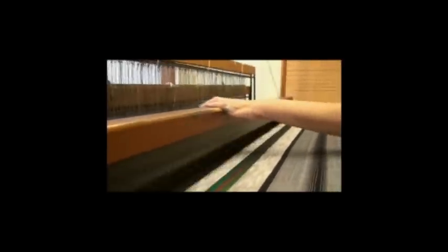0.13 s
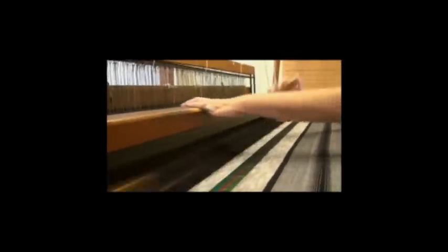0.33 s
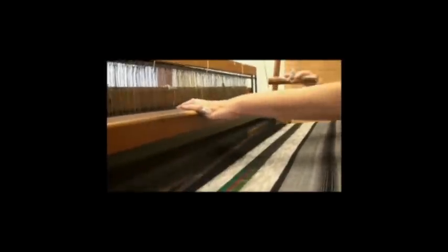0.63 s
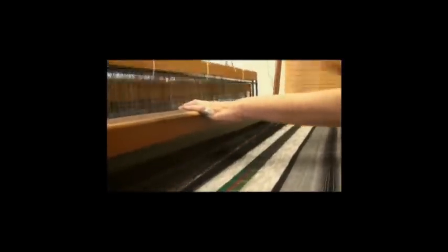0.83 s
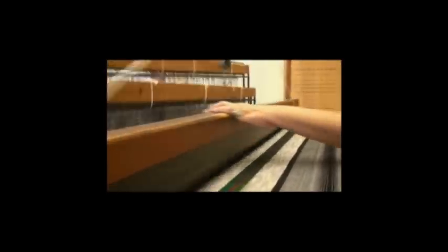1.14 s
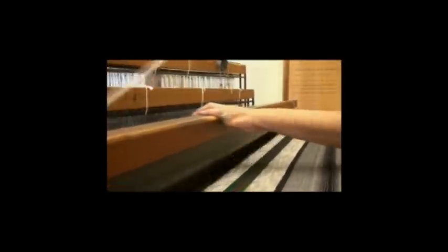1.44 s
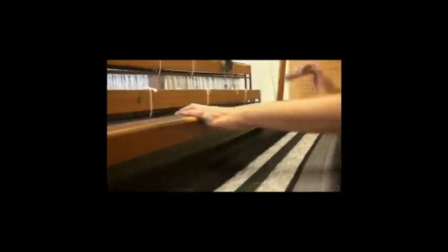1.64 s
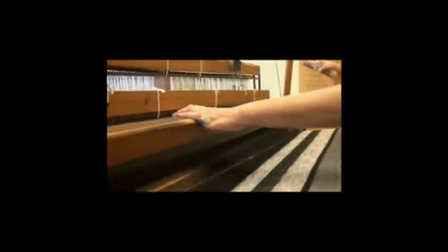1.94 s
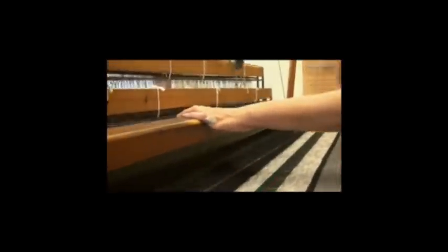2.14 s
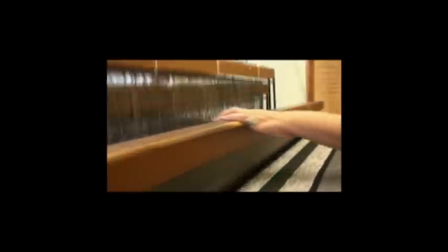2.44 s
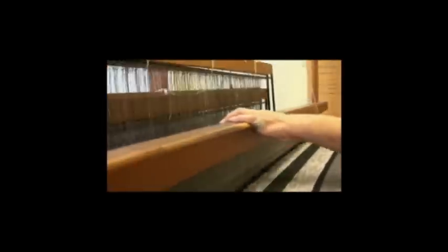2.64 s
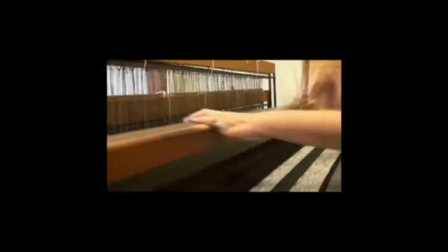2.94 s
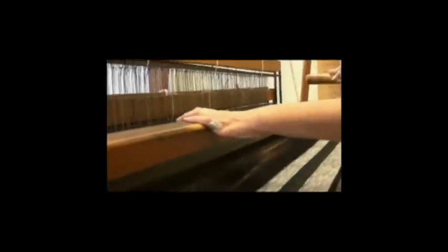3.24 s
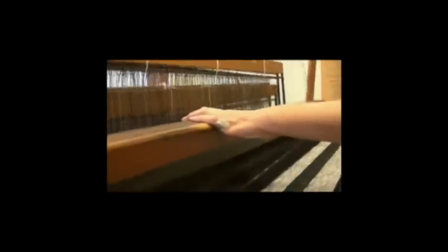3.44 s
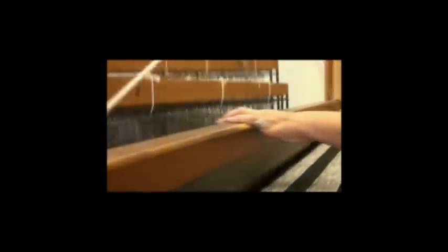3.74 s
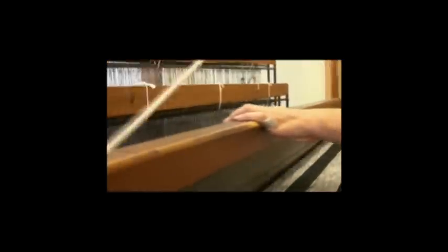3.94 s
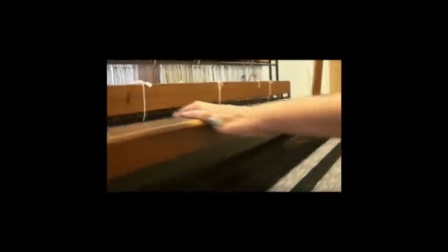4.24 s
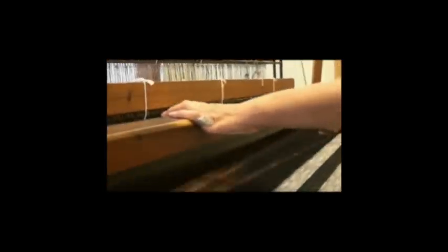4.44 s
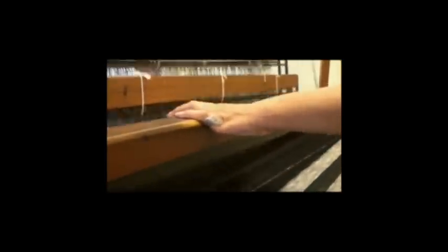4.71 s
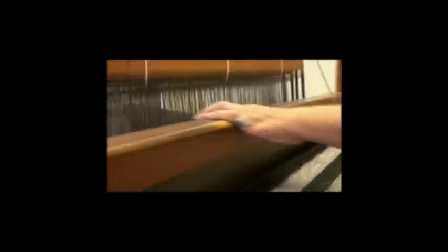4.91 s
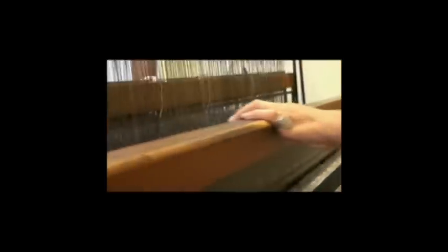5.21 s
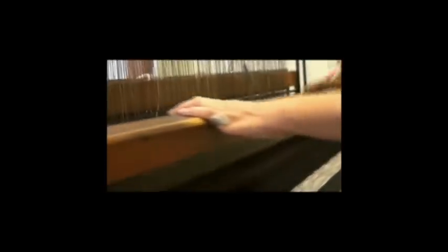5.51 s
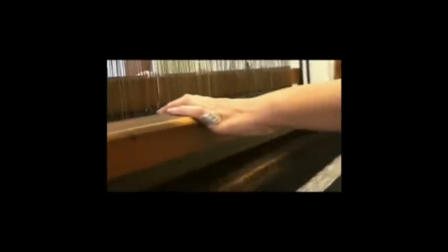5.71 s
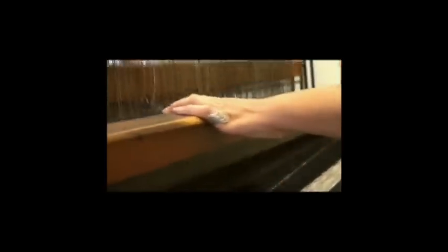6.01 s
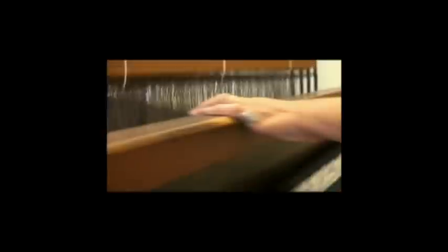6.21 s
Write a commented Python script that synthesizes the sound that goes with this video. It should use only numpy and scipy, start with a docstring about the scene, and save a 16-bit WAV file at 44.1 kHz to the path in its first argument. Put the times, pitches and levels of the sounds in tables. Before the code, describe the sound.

A wooden hand loom clatters rhythmically, its shuttle rattling across and its beater knocking, with high squeaks between strokes.

```python
"""A wooden hand loom

In a small workshop, close to a stereo microphone, the shuttle is knocked across and rattles along
its track. The beater (the bar that packs the thread) and the shafts (the frames that lift it) thud
and shake the heddles, their thin wires. Dry pivots squeak and creak each time the shafts change over."""
import sys
import numpy as np
from scipy import signal
from scipy.fft import rfft, irfft
from scipy.io import wavfile
from scipy.ndimage import uniform_filter1d

SR = 44100
rng = np.random.default_rng(int(sys.argv[2]) if len(sys.argv) > 2 else 0)


def unload_wav(signal):
    """Save mono or channel-first audio to the path in sys.argv[1] as 16-bit WAV at rate SR, clipped to [-1, 1]."""
    wavfile.write(
        sys.argv[1],
        SR,
        np.round(np.clip(np.atleast_2d(signal).T, -1, 1) * 32767).astype(np.int16),
    )


N = 280476


def amp(db):
    """Turns decibels into a multiplier."""
    return 10 ** (np.asarray(db) / 20)


def unit_rms(x):
    """Scales x to an average strength (rms) of 1."""
    return x / np.sqrt(np.mean(x ** 2) + 1e-20)


def curve_at(points, hz):
    """Reads a curve of (frequency, value) points at hz."""
    f, value = np.transpose(points)
    return np.interp(np.log(hz + 1), np.log(f + 1), value)


def add(mix, start, sound, pan_db=0):
    """Mixes a sound in at start seconds, pan_db louder on the left than on the right."""
    part = mix[:, round(start * SR):][:, :sound.shape[-1]]
    part += sound[..., :part.shape[1]] * amp([[pan_db / 2], [-pan_db / 2]])


def coloured(x, points):
    """Shapes the lows and highs of x by (Hz, dB) points, at rms 1."""
    size = x.shape[-1]
    gain = amp(curve_at(points, np.fft.rfftfreq(size, 1 / SR)))
    return unit_rms(irfft(rfft(x) * gain, size))


def wander(size, hz):
    """A smooth random wobble of rms 1, changing about hz times a second."""
    span = max(round(SR / hz), 2)
    return unit_rms(uniform_filter1d(uniform_filter1d(rng.standard_normal(size), span), span))


# tone of the background noise: f/Hz, relative level/dB
AIR_TONE = [(25, 41.5), (60, 18), (100, 27), (160, 24), (1000, 17), (5000, -29), (14000, -32)]

def air():
    """The quiet workshop: a low rush, almost the same in both ears."""
    common, other = coloured(rng.standard_normal((2, N)), AIR_TONE)
    return amp(-46.5) * np.array([common + 0.043 * other, common - 0.1 * other])


# how long the room takes to fade by 60 dB: f/Hz, fade/s
ROOM_FADE = [(200, 0.4), (1000, 0.31), (3000, 0.25), (10000, 0.33)]

def room(x):
    """Many small echoes blur into a tail; each band dies at its own speed."""
    echoes = np.zeros((2, SR // 2))
    delays = np.arange(200, SR // 2 - 20, 20) + rng.integers(0, 20, (2, (SR // 2 - 201) // 20))
    np.put_along_axis(echoes, delays, rng.choice([-1., 1.], delays.shape), 1)
    hz, t, bands = signal.stft(echoes, SR, nperseg=256)
    fade = amp(-60 * t / curve_at(ROOM_FADE, hz)[:, None])
    tail = signal.istft(bands * fade, SR, nperseg=256)[1]
    tail = tail + 0.2 * tail[::-1]  # close microphones hear much the same room
    return signal.fftconvolve(x[None], tail / np.linalg.norm(tail[0]), axes=1)[:, :N]


# the frame booms on the floor: t/s, level/dB
FLOOR_THUDS = [(0.025, -39), (1.356, -22.5), (2.252, -36), (2.672, -35.5)]

def thud(db):
    """Frame and floor ring with two low notes."""
    t = np.arange(12000) / SR
    boom = np.sin(2 * np.pi * 158 * t) + .25 * np.sin(2 * np.pi * 105 * t)
    return amp(db - 60 * t / .27) * boom * (1 - np.exp(-t / .01))


def slip_tone(hz, levels, unsteady, flutter_db, rasp):
    """Surfaces stick and slip unevenly; each harmonic (multiple, dB) flutters and rasps on its own."""
    size = len(hz)
    turns = np.cumsum(hz * (1 + unsteady * wander(size, 260))) / SR
    tone = np.zeros(size)
    for k, db in levels:
        level = amp(db + flutter_db * wander(size, 150)) * (1 + rasp * wander(size, 1500))
        tone += level * np.sin(2 * np.pi * k * turns) * (k * hz < SR / 2)
    return np.sqrt(2) * tone * signal.windows.tukey(size, .3)


# harmonics of a creak: multiple of the pitch, relative level/dB
CREAK_HARMONICS = [(1, -0.5), (2, -6), (3, -12), (5, 0.5), (6, -4.5), (7, -16), (9, -11), (11, -13)]
# the pivots creak: start/s, end/s, f/Hz, level/dB, brightness/(dB per octave)
PIVOT_CREAKS = [(0.941, 1.02, 1294, -32, -1), (1.088, 1.16, 1290, -32.5, 1.5),
                (1.141, 1.218, 1286, -32.5, 0), (1.191, 1.302, 1269, -34.5, 0),
                (3.586, 3.65, 1320, -42, 4.5), (3.753, 3.81, 1355, -33, 1), (3.793, 3.909, 1281, -34.5, -2),
                (6.127, 6.307, 1275, -38, -1.5), (6.273, 6.412, 1290, -29, -0.5)]

def creak(start, end, hz, db, bright_db):
    """A pivot sticks and slips at one pitch; a bar sings along when a harmonic meets its note."""
    bar_hz, bar_width_hz, bar_db = 2543, 51, 11
    levels = []
    for k, harmonic_db in CREAK_HARMONICS:
        boost_db = bar_db / (1 + ((k * hz - bar_hz) / bar_width_hz) ** 2)
        levels.append((k, db + harmonic_db + bright_db * np.log2(k) + boost_db))
    pitch = np.full(round((end - start) * SR), float(hz))
    return slip_tone(pitch, levels, unsteady=.0028, flutter_db=2.6, rasp=.28)


# hiss of the rubbing faces: f/Hz, relative level/dB
HISS_TONE = [(2000, -26), (6000, 11), (11000, 11), (16000, -1)]
# the pivots squeak: start/s, end/s, first f/Hz, bend/Hz, last f/Hz, level/dB, harmonic step/dB
PIVOT_SQUEAKS = [(0.951, 1.031, 5300, -5, 5200, -30, -12), (1.019, 1.096, 5030, 340, 5340, -25.5, -12),
                 (1.108, 1.191, 4730, 353, 5200, -27, -5.5), (1.245, 1.32, 7300, -8, 7400, -42, -18),
                 (1.264, 1.346, 5140, 80, 5300, -32, -15), (1.358, 1.517, 5600, 4, 5480, -42.5, -10),
                 (2.235, 2.343, 5150, -32, 4940, -36, 0), (2.334, 2.442, 10470, 53, 10500, -36.5, -35),
                 (2.41, 2.52, 14900, 0, 15100, -35.5, -32), (2.451, 2.525, 10700, 7, 10760, -30, -32),
                 (2.502, 2.593, 5710, -350, 5230, -28.5, -2.5), (2.596, 2.656, 5030, 247, 5460, -33, -7),
                 (2.597, 2.664, 6600, -7, 6540, -36.5, -24), (3.541, 3.664, 5730, 27, 4890, -34, -7.5),
                 (3.659, 3.758, 5040, 329, 5370, -25, -10.5), (3.755, 3.844, 4730, 260.5, 5300, -25.5, -9),
                 (3.822, 3.967, 7620, -120, 7360, -33, -16), (3.838, 3.946, 5900, -6, 5800, -36, -8),
                 (3.958, 4.06, 5040, 100, 5500, -49, -12), (4.811, 4.897, 7940, -51, 7840, -28, -24),
                 (4.874, 4.966, 7470, -3, 7430, -31, -21), (4.88, 5.06, 5150, -120, 5090, -29.5, -2),
                 (4.994, 5.089, 5690, 118, 5330, -27, -3.5), (5.063, 5.183, 5090, -200, 5015, -30, -1.5),
                 (5.135, 5.226, 5170, 78, 5720, -34.5, -7), (5.151, 5.237, 2267, 56, 2214, -39, -1.5),
                 (6.045, 6.219, 5380, -14, 5280, -38, -10), (6.197, 6.309, 5080, 405, 5200, -26.5, -10.5),
                 (6.294, 6.383, 4750, 136, 5450, -28.5, -7)]

def squeak(start, end, first_hz, bend_hz, last_hz, db, step_db):
    """Two rubbing faces slip not quite in step, making a gliding squeak and a hiss."""
    size = round((end - start) * SR)
    progress = np.linspace(0, 1, size)
    hz = first_hz + (last_hz - first_hz) * progress + bend_hz * np.sin(np.pi * progress ** 0.79)
    far_hz = hz * (1 + 0.032 * wander(size, 40))
    dbs = db + step_db * np.arange(3) ** 1.1
    hiss = coloured(rng.standard_normal(size), HISS_TONE) * signal.windows.tukey(size, .5)
    hiss *= amp(dbs.max() - 11 + 4.6 * wander(size, 150))
    near = slip_tone(hz, enumerate(dbs, 1), unsteady=0.007, flutter_db=4.5, rasp=0.33)
    far = slip_tone(far_hz, enumerate(dbs, 1), unsteady=0.009, flutter_db=5.5, rasp=0.5)
    return hiss + 0.67 * near + np.array([[0.36], [0.6]]) * far  # the far face lies to the right


# the beater's pivot chirps: t/s, level/dB, f/Hz
BEATER_CHIRPS = [(2.069, -38.5, 2520), (2.098, -34.5, 2640), (2.115, -28.5, 2550), (2.13, -33, 2534),
                 (2.17, -35, 2610), (4.7, -33.5, 2600), (4.731, -29, 2530), (4.76, -29, 2360)]

def chirp(start, db, hz):
    """A tiny falling squeak as the beater comes forward."""
    return squeak(start, start + .011, hz, bend_hz=0, last_hz=hz * 0.936, db=db, step_db=-15)


def stroke(start, swell, hold, fall_db_s):
    """The loudness of one movement: it swells, holds, then dies away."""
    age = np.arange(N) / SR - start
    return np.clip(age / swell, 0, 1) * amp(-fall_db_s * np.maximum(age - swell - hold, 0))


# the loom's movements: t/s, swell/s, hold/s, rattle level/dB, scrape level/dB, rustle level/dB
CORD_PULLS = [(0.29, 0.019, 0.096, -36.5, -44, -55), (1.58, 0.18, 0.011, -37, -47, -52.5),
              (2.96, 0.011, 0.12, -39, -43.5, -52), (4.2, .12, .02, -40.5, -57, -54.5),
              (5.47, 0.17, .01, -35, -40, -54)]  # the cord is drawn before the throw
SHUTTLE_THROWS = [(0.405, 0.072, 0.0039, -23, -30.5, -37.5), (1.748, 0.021, 0.066, -29.5, -27, -39.5),
                  (3.048, 0.048, 0.0035, -22, -25.5, -37), (4.346, 0.006, 0.087, -33, -27, -38.5),
                  (5.61, 0.065, 0.0068, -24, -26, -37)]  # the shuttle runs along its track
BEATER_SWINGS = [(0.79, 0.0028, 0.0096, -74, -55, -43.5), (1.98, 0.0066, 0.038, -43, -46, -49.5),
                 (2.16, 0.0089, 0.011, -46, -53, -48), (3.265, 0.015, 0.11, -53, -48, -47),
                 (5.85, 0.0076, 0.014, -42, -46, -51.5), (5.96, 0.0025, 0.1, -66, -47.5, -49)]  # the beater starts forward
BEATER_HITS = [(0.822, 0.0073, 0.052, -22.5, -28, -32.5), (2.185, 0.033, 0.0046, -25, -38, -39.5),
               (3.458, 0.026, 0.032, -20.5, -25.5, -31.5), (4.766, 0.0057, 0.0082, -26.5, -37, -39),
               (6.033, 0.014, 0.042, -22, -27.5, -33)]  # it packs the thread
SHAFT_CHANGES = [(0.99, 0.034, .01, -30, -28.5, -39), (1.07, .16, 0.011, -35.5, -42, -35),
                 (2.23, 0.026, 0.15, -34, -34.5, -53), (2.48, 0.043, 0.1, -38, -50, -50.5),
                 (3.63, 0.043, 0.0028, -28.5, -28, -36), (3.72, 0.16, 0.0045, -34.5, -34.5, -36.5),
                 (4.81, 0.027, 0.086, -30.5, -33, -53), (5.0, 0.13, 0.022, -35.5, -39, -43),
                 (6.13, 0.075, 0.022, -33.5, -32, -41)]  # the shafts lurch past each other
BEATER_RETURNS = [(0.01, 0.015, 0.0078, -26.5, -36.5, -47.5), (1.345, 0.014, 0.0043, -24, -41, -66),
                  (2.66, 0.011, 0.0057, -25, -39.5, -52), (3.965, 0.013, 0.004, -25.5, -46, -69),
                  (5.255, 0.0066, 0.0037, -27.5, -43.5, -50)]  # the beater swings back to rest

def stroke_levels():
    """How strong rattle, scrape and rustle are over time: the powers of all movements add up."""
    power = amp([-55, -60, -66])[:, None] ** 2 * np.ones(N)  # they never quite stop
    # movements, fall of the rattle/(dB per s), fall of scrape and rustle/(dB per s), their lag/s
    kinds = [(CORD_PULLS, 130, 200, .005), (SHUTTLE_THROWS, 142, 143, .00062),
             (BEATER_SWINGS, 260, 140, .00076), (BEATER_HITS, 164, 213, .038),
             (SHAFT_CHANGES, 116, 121, .002), (BEATER_RETURNS, 161, 74, .0018)]
    for rows, low_fall, high_fall, lag in kinds:
        for start, swell, hold, *dbs in rows:
            low = stroke(start, swell, hold, low_fall)
            high = stroke(start, swell + lag, max(hold - lag, 0), high_fall)
            power += (amp(dbs)[:, None] * [low, high, high]) ** 2
    return np.sqrt(power)


# tone of the heddles' rustle, also used for the crack of a knock: f/Hz, relative level/dB
BRIGHT_TONE = [(3000, -8.5), (6000, 6), (10000, -4), (13500, -14.5), (16000, -24)]

def rustle(hits):
    """The heddles tick together and each wire rings briefly, spread left and right."""
    t = np.arange(1500) / SR
    wires_hz = np.geomspace(4000, 15500, num=50)[:, None] * rng.uniform(.98, 1.02, (50, 1))
    chime = (np.sin(2 * np.pi * wires_hz * t) * amp(-60 * t / 0.038)).sum(0)
    ringing = unit_rms(signal.oaconvolve(hits, chime[None], axes=1)[:, :N])
    middle, spread = coloured(unit_rms(hits) + 0.077 * ringing, BRIGHT_TONE) * amp(7.5)
    return middle + 0.21 * spread * np.array([[1], [-1]])


# tone of the sliding parts: f/Hz, relative level/dB
SCRAPE_TONE = [(1500, -15.5), (2800, 2), (5000, -1.5), (8000, -30)]

def scrape(hits):
    """The tiny contacts of sliding parts blur into a scrape."""
    return coloured(hits, SCRAPE_TONE) * amp(1.5)


# the notes the wood rings with, in rattles and knocks: f/Hz, relative level/dB, fade after a knock/s
WOOD_NOTES = [(240, -22, 0.027), (336, -20, 0.041), (479, -6, 0.016), (729.4, -2, 0.038), (903, 4, 0.016),
              (1176, 2, 0.018), (1350, 9.5, 0.019), (1856, 13, 0.014), (2327, 17, 0.0071),
              (2888, 10, 0.018), (3432, 12.5, 0.017), (4420, 10, 0.026)]

def rattle(hits):
    """Each soft contact briefly rings one note of the wood, picked at random; the notes around 1 to 2.5 kHz
    sound strongest."""
    t = np.arange(1500) / SR
    struck_note, sound = rng.integers(0, len(WOOD_NOTES), N), np.zeros(N)
    for k, (hz, db, fade) in enumerate(WOOD_NOTES):
        tap = amp(db - 5.4 * hz / 1000 - 60 * t / (0.55 * fade)) * np.sin(2 * np.pi * hz * t)
        sound += signal.oaconvolve(hits * (struck_note == k), tap)[:N]
    bass_cut = signal.butter(2, 260, "high", fs=SR, output="sos")  # small parts give off no deep bass
    return unit_rms(signal.sosfilt(bass_cut, sound))


def moving_parts():
    """Thousands of tiny contacts make the loom rattle, scrape and rustle as it moves."""
    contacts_per_s = 5500
    wood, sliding, heddles = stroke_levels()
    strength = amp(2.67 * np.minimum(rng.exponential(1, (4, N)), 5)) * rng.choice([-1, 1], (4, N))
    hits = strength * (rng.random((4, N)) < contacts_per_s / SR)
    sound = wood * rattle(hits[0]) + sliding * scrape(hits[1])
    clumps = amp(2 * wander(N, 120) - 1)  # the contacts come in clumps
    return clumps * (sound + heddles * rustle(hits[2:]))


def shuttle_side(time):
    """Which side the shuttle is on: 0 or 1, swapping at every hit of the beater."""
    return sum(hit[0] < time for hit in BEATER_HITS) % 2


# the shuttle's own notes: f/Hz, relative level/dB, fade/s
SHUTTLE_NOTES = [(1220, 0, .05), (1290, 4.5, 0.037), (1904, 5.5, 0.051), (1940, 2, 0.027),
                 (3470, 1.5, 0.049), (4200, 5, 0.03)]

def shuttle():
    """Rubbing along the track makes the shuttle sing, louder on every second throw."""
    side_db = (-45, -26)
    t = np.arange(3000) / SR
    body = sum(amp(db - 60 * t / fade) * np.sin(2 * np.pi * hz * t) for hz, db, fade in SHUTTLE_NOTES)
    level = sum(amp(side_db[shuttle_side(start)]) * stroke(start, swell, hold, fall_db_s=142)
                for start, swell, hold, *_ in SHUTTLE_THROWS)
    return level * unit_rms(signal.oaconvolve(rng.standard_normal(N), body)[:N])


# blows of wood on wood: t/s, level/dB, strongest f/Hz, relative crack level/dB
WOOD_KNOCKS = [(0.023, -17.5, 2470, -33), (0.129, -20.5, 1350, -31), (0.298, -20.5, 2020, -26),
               (0.33, -17, 493, -28.5), (0.411, -12.5, 1485, -28), (0.537, -25.5, 980, -7.5),
               (0.639, -27.5, 773, -15), (0.828, -12, 750, -54), (0.857, -10, 1170, -24),
               (1.006, -7, 2166, -29), (1.162, -17.5, 1500, -33), (1.218, -17, 1390, -35),
               (1.242, -19.5, 1440, -35), (1.356, -20, 874, -31), (1.589, -24.5, 1240, -23.5),
               (1.694, -21, 2080, -31), (1.762, -9, 3570, -27.5), (1.982, -24.5, 770, -25.5),
               (2.51, -27, 1170, -34), (2.595, -24.5, 1960, -18), (2.638, -20.5, 1960, -33),
               (2.183, -19.5, 2300, -36), (2.197, -14.5, 700, -52), (2.208, -12, 1503, -19.5),
               (2.226, -11.5, 2320, -48), (2.296, -13, 2280, -38), (2.314, -12, 1490, -24.5),
               (2.367, -22.5, 1470, -33), (2.4, -18, 1520, -22.5), (2.669, -12.5, 2736, -32),
               (2.933, -28.5, 1050, -26), (2.973, -16.5, 385, -29.5), (3.034, -22, 630, -45),
               (3.044, -11, 3030, -27), (3.176, -31.5, 5610, -1.5), (3.269, -39, 4330, -5),
               (3.47, -12, 1190, -37), (3.656, -9.5, 2710, -33), (3.859, -12.5, 1370, -30),
               (3.892, -19, 3000, -31), (3.972, -17.5, 990, -46), (4.071, -17, 2830, -35),
               (4.173, -23, 1350, -25.5), (4.354, -10, 3530, -36), (4.612, -30, 3330, -16.5),
               (4.73, -38, 5300, -3.5), (3.308, -26.5, 2320, -26), (3.792, -17, 2466, -37),
               (5.784, -27, 3230, -20), (5.796, -25.5, 3000, -19), (4.772, -10, 697, -45),
               (4.783, -9.5, 1590, -23.5), (4.799, -16, 1590, -30), (4.844, -16, 1500, -31),
               (4.866, -17.5, 1780, -28), (4.896, -27, 1480, -26), (5.136, -15, 2556, -36),
               (5.261, -12, 2620, -35), (5.52, -31, 1064, -26), (5.544, -17.5, 790, -43),
               (5.563, -23.5, 355, -24.5), (5.625, -10.5, 3310, -26), (5.738, -25.5, 5570, -7.5),
               (5.94, -32.5, 2510, -41), (6.045, -15, 890, -24)]

def knock(level_db, hz, crack_db):
    """Wood hits wood: notes near the struck pitch ring most, and a short crack adds the highs."""
    t = np.arange(2500) / SR
    f, db, fade = np.transpose(3 * WOOD_NOTES)[:, :, None]  # three bars
    f = f * (1 + .1 * rng.standard_normal(f.shape))  # struck at another spot each time
    nearest = abs(np.log(f / hz)).argmin()
    db = db - 9 * abs(np.log2(f / hz))
    f[nearest], db[nearest] = hz, db.max() + 3.5  # the struck bar itself
    ring = (amp(db - 60 * t / fade) * np.sin(2 * np.pi * (f * t + rng.random(f.shape)))).sum(0)
    ring *= 1 - np.exp(-t / 0.0006)
    crack = coloured(rng.standard_normal(len(t)), BRIGHT_TONE) * amp(crack_db + 12 - 60 * t / 0.036)
    return amp(level_db + 2) * (ring / abs(ring).max() + crack)


def scene():
    """The whole loom in its workshop; the knocks echo more than the rest."""
    knocks, moving = np.zeros((2, 2, N))
    side_pan_db = (6, 4.5)  # the knocks shift as the shuttle changes sides
    for start, db, hz, crack_db in WOOD_KNOCKS:
        add(knocks, start, knock(db, hz, crack_db), side_pan_db[shuttle_side(start)])
    for start, db in FLOOR_THUDS:
        add(moving, start, thud(db))
    for row in PIVOT_SQUEAKS:
        add(moving, row[0], squeak(*row), pan_db=.8)
    for row in PIVOT_CREAKS:
        add(moving, row[0], creak(*row), pan_db=.3)
    for row in BEATER_CHIRPS:
        add(moving, row[0], chirp(*row), pan_db=1.5)
    add(moving, 0, moving_parts() + shuttle(), pan_db=.5)
    into_room = amp(-3.5) * knocks.mean(0) + amp(-8.5) * moving.mean(0)
    return knocks + moving + room(into_room) + air()


def record(dry):
    """The microphone drops deep bass, narrows the stereo in lows and highs, and rounds off peaks."""
    dry = signal.sosfilt(signal.butter(3, 85, "high", fs=SR, output="sos"), dry)
    mid, side = (dry[0] + dry[1]) / 2, (dry[0] - dry[1]) / 2
    side = 0.37 * side + 0.83 * signal.oaconvolve(side, signal.firwin(101, 10800, fs=SR), "same")
    side = signal.sosfilt(signal.butter(1, 150, "high", fs=SR, output="sos"), side)
    rounded = np.tanh(np.array([mid + side, mid - side]) / .55) * .55
    top_cut = signal.firwin(511, 16100, window=("kaiser", 9), fs=SR)  # removes the very highest sounds
    return signal.oaconvolve(rounded, top_cut[None], "same")


dry = scene()
out = record(dry)
unload_wav(out)
```